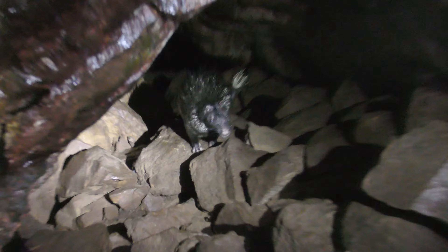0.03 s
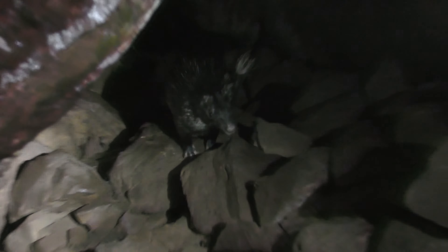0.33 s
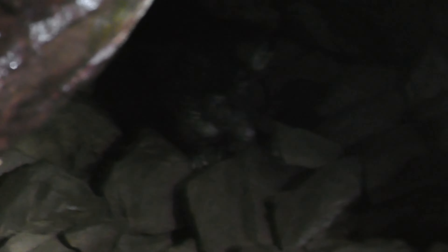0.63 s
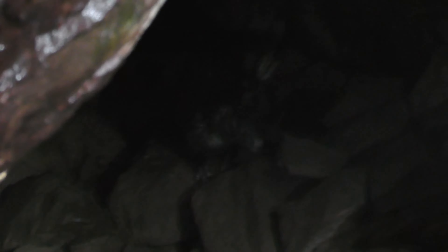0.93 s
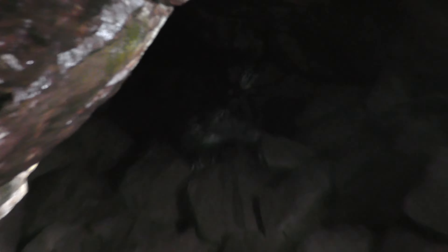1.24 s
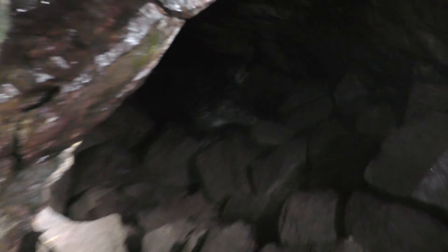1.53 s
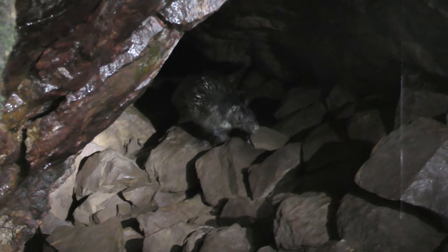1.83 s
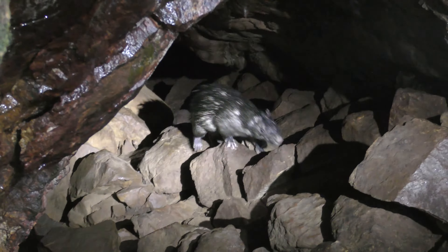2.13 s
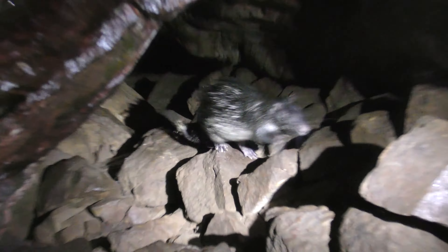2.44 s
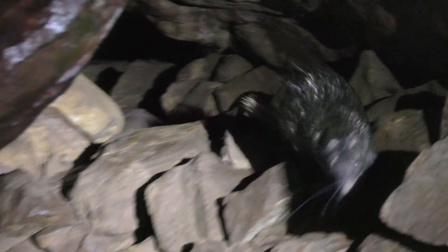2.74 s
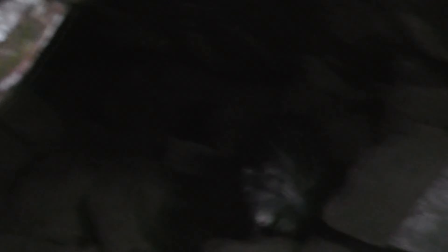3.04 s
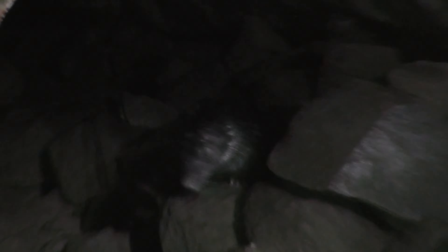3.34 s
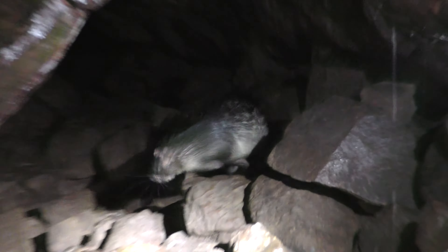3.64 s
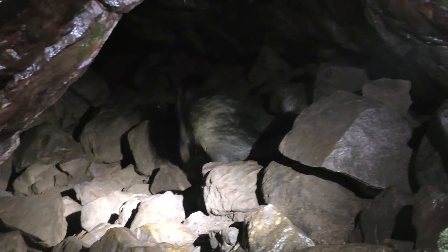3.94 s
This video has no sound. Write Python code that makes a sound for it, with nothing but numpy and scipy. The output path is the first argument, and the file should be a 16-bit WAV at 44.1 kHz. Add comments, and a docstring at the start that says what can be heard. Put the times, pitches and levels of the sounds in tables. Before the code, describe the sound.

A porcupine sniffs close by in a rock hollow, over steady air noise and a faint quill rustle. Claws tick on stone from the start, and sparse short sniffs begin around 0.6 seconds. From about 2.3 seconds the sniffs come quickly, with more clicks. Between 3.2 and 3.6 seconds it blows one long hiss with a fading nose whistle, and a few more sniffs and scrapes follow until 4 seconds.

```python
"""A porcupine noses over loose stones in a low rock hollow, close to the microphone.
A steady rush of air and a faint rustle come in first, with claws and quills ticking on stone.
Short sniffs puff through the nose, sparse at first, then about fourteen a second as it grows keen.
Just after three seconds it blows out one long hiss with a fading nostril whistle,
and ends on a few more sniffs and scrapes."""
import sys
import numpy as np
from scipy import signal
from scipy.io import wavfile
from scipy.ndimage import uniform_filter1d

SR = 44100
rng = np.random.default_rng(int(sys.argv[2]) if len(sys.argv) > 2 else 0)


def log_audio(samples):
    """Write samples as a 16-bit WAV file to the path given in sys.argv[1]."""
    # one column per channel
    frames = np.atleast_2d(samples).T
    # limit to full scale, then quantise
    limited = np.clip(frames, -1, 1)
    pcm = np.round(limited * 32767).astype(np.int16)
    wavfile.write(sys.argv[1], SR, pcm)


N = 176400

# Sniff cues, with the mix of five nose resonances (positive pan is left throughout):
# start_s, rise_s, length_s, nostril_hz, upper_hz, throat_db, nostril_db, upper_db, edge_db,
# fizz_db, pan_db
SNIFF_CUES = [(0.649, 0.0026, 0.017, 4984, 6820, -47.0, -49, -59, -52, -62.3, -1.9),
              (0.706, 0.004, 0.0193, 4900, 6879, -55, -48, -63, -66, -67, 3.6),
              (1.0804, 0.0044, 0.0097, 4690, 6030, -41.2, -34, -48, -43, -35, -6.0),
              (1.225, 0.008, 0.013, 4650, 6820, -54, -41.5, -46, -44, -43.5, -4.4),
              (1.393, 0.0013, 0.02, 4520, 7130, -53, -37, -48, -50, -46.8, -4),
              (1.536, 0.006, 0.014, 4820, 6066, -49.8, -40, -43, -44, -41, -4.3),
              (2.258, 0.0013, 0.013, 4680, 7560, -49.0, -35, -40, -35, -43, -3.5),
              (2.355, 0.0011, 0.0054, 4140, 7270, -42.5, -34.5, -34, -49, -43.0, -5),
              (2.41, 0.0026, 0.01, 4530, 6310, -58, -32, -34, -32, -45, -3),
              (2.486, 0.0031, 0.0068, 4216, 7070, -37.5, -25, -31.4, -36, -38.7, -5.0),
              (2.561, 0.0015, 0.012, 4430, 7220, -48, -40.5, -35.5, -40.5, -44.9, -2.1),
              (2.626, 0.006, 0.017, 4510, 7924, -39, -38, -38.5, -48, -46, -3),
              (2.6986, 0.0043, 0.015, 4500, 7531, -48, -41.5, -36.5, -40.5, -45, -2.9),
              (2.775, 0.0015, 0.014, 4190, 6570, -37.5, -36, -45, -43, -43, -2.8),
              (2.832, 0.0071, 0.018, 4240, 5980, -57, -41.5, -43, -40.2, -42.4, -2),
              (2.967, 0.0018, 0.031, 4350, 7020, -60, -38, -42, -41.5, -52, -2.9),
              (3.1016, 0.0043, 0.014, 4460, 7850, -40.5, -31, -33.5, -49, -41, -2.5),
              (3.4234, 0.0045, 0.0183, 3999, 8220, -43.5, -35, -41.5, -57, -50, -2),
              (3.603, 0.0015, 0.027, 4440, 8200, -60, -39.5, -46, -61, -52, -3.1),
              (3.7547, 0.0054, 0.011, 4460, 7789, -44, -29, -43, -37.5, -46, -6.1),
              (3.772, 0.0015, 0.013, 4290, 7784, -60, -36.5, -41, -51, -44, -1),
              (3.937, 0.0056, 0.0099, 3850, 6450, -47.3, -41.5, -34, -49, -44, -0.7)]


def sniff(rise_s, length_s, nostril_hz, upper_hz, throat_db, nostril_db, upper_db, edge_db,
          fizz_db, pan_db):
    """A fluttering puff of air through the resonances of the nose; a thin whistle lingers."""
    release_s, ring_release_s, flutter_s, flutter_db, ring_db = 0.0055, 0.014, 0.0011, 3, -11.5
    t = np.arange(SR // 16) / SR
    attack, past_end_s = np.minimum(t / rise_s, 1), np.maximum(t - length_s, 0)
    flutter = unit(uniform_filter1d(rng.standard_normal(len(t)), int(flutter_s * SR)))
    flow = attack * np.exp(-past_end_s / release_s) * amp(flutter_db * flutter)
    # pitch_hz, width_hz, level_db
    nose = [(2406, 1930, throat_db), (nostril_hz, 1070, nostril_db), (upper_hz, 1650, upper_db),
            (9600, 2200, edge_db), (12430, 5000, fizz_db)]
    puff = sum(amp(db) * unit(flow * turbulence(len(t), hz, width)) for hz, width, db in nose)
    linger = attack * np.exp(-past_end_s / ring_release_s) * (1 - t / t[-1])
    puff += amp(nostril_db + ring_db) * unit(linger * turbulence(len(t), nostril_hz, width_hz=200))
    puff *= np.sqrt(length_s / t[-1])  # longer puffs carry more energy
    return hollow(puff, pan_db, wet_db=-3)


# Swell and fade of the long breath: time_s, level_db
HISS_ENVELOPE = [(3.158, -46), (3.167, -38.5), (3.22, -35.5), (3.3, -34.5), (3.37, -36), (3.42, -37),
                 (3.47, -39), (3.53, -42.5), (3.58, -46)]
# Tone of the breath, brightest in the low treble: frequency_hz, gain_db
HISS_EQ = [(300, -30), (800, -12), (1250, -1), (1900, -8), (3300, -5.5), (4000, 9), (5100, 6), (6500, 3.5),
           (8200, 1.5), (10000, 1), (12000, -6.5), (16000, -9)]


def hiss():
    """The animal blows out at length: uneven hiss with a nostril whistle that fades early."""
    patch_db, whistle_db, fade_db_per_s, pan_db = 1, 0.5, 75, -1
    cue_s, level_db = np.transpose(HISS_ENVELOPE)
    t = np.arange(N) / SR
    flow = amp(np.interp(t, cue_s, level_db)) * (t > cue_s[0]) * (t < cue_s[-1])
    spectrum = signal.stft(rng.standard_normal(N), nperseg=512)[2]
    spectrum *= amp(patch_db * patches(rng.standard_normal(spectrum.shape), 4, 5))
    rush = signal.istft(spectrum, nperseg=512)[1]
    rush = unit(equalise(rush, HISS_EQ)[:N])
    fade = amp(whistle_db - fade_db_per_s * np.maximum(t - cue_s[0], 0))
    whistle = turbulence(N, hz=3980, width_hz=100) * fade
    breath = hollow(flow * rush, pan_db, wet_db=-5.5) + hollow(flow * whistle, pan_db, wet_db=-10)
    return breath[:, :N]


# Claw and quill hits, each with its own four-band EQ:
# start_s, length_s, low_db, mid_db, high_db, top_db, pan_db
STONE_HITS = [(0.0864, 0.0031, -4, -9, -10, -28, -2), (0.385, 0.001, -5.5, -9, -6, -24, -3),
              (0.5516, 0.00036, 1, -9, -7, -21.3, 1.8), (0.5527, 0.00026, -4, -3, -11.5, -13.9, -1),
              (0.558, 0.0002, -4, -7, -11, -19.1, 5), (0.5745, 0.0016, 4, -1.5, -4, -11, -0.2),
              (1.073, 0.002, -3.5, -24, -14, -14, 2.2), (1.088, 0.0011, -14, 6, -20, -18, -7.5),
              (1.631, 0.0011, -5.5, -6.5, -16, -36.6, 2), (2.2014, 0.0001, -9.5, -2, 7, -8.0, -4.6),
              (2.2423, 0.001, -12, -5, -26, -35.3, 0.4), (2.266, 0.0016, -19, 3.8, -14, -20, -13),
              (2.637, 0.0017, -1.5, 1.5, -24, -16, -17), (2.718, 0.002, -2.5, -14, -16, -14, -11),
              (2.777, 0.0024, 2.3, -3, -29, -24, -13), (2.8132, 0.0033, -2.5, -7, -8, -16, 3),
              (2.955, 0.001, -55, -13.5, -12, -21.1, 2.6), (3.016, 0.0053, -10, -12, -29, -30, 0),
              (3.097, 0.0014, -2, -7, -24, -20.3, -6), (3.17, 0.0025, -3, -2, -21, -14.5, -5),
              (3.245, 0.0033, -4.5, -22, -20, -31, 4), (3.349, 0.0098, -2, -25, -17, -21.3, -9),
              (3.366, 0.008, 0.3, -31, -15, -24, -5), (3.438, 0.0042, -6, 5, -24, -13.3, -18),
              (3.524, 0.012, -1, -22, -22, -27, -4), (3.554, 0.0033, 9.5, -6, -1.5, -2, -2.5),
              (3.592, 0.00059, 5, -14, -18, -15.9, -1.0), (3.5933, 0.0038, -1, -6, -6, -18, -2.1),
              (3.809, 0.0034, -1.5, -20, -19.7, -25.6, 1.4), (3.886, 0.003, -23, -18, -13, -14, -2),
              (3.917, 0.0052, -5.5, -18, -16, -26, 0)]
# The low, mid, high and top bands: frequency_hz
STONE_BANDS = [2230, 3980, 8200, 13500]
# Body of the stone, relative to the low band: frequency_hz, gain_db
STONE_BODY_EQ = [(60, -27), (340, -6.5), (600, -14.5), (830, -14), (1200, -3)]


def stone_hit(length_s, low_db, mid_db, high_db, top_db, pan_db):
    """A hard tip meets stone: a single snap when short, a gritty scrape when longer."""
    grit_spread_db, grit_density = 2.1, 0.6
    t = np.arange(SR // 50) / SR
    grit = rng.standard_normal(len(t)) * amp(grit_spread_db * rng.exponential(1, len(t)))
    grit *= rng.random(len(t)) < grit_density
    grit[0] = 3  # the first touch
    grit *= np.exp(-(t / length_s) ** 2)
    body = [(hz, low_db + db) for hz, db in STONE_BODY_EQ]
    bands = list(zip(STONE_BANDS, [low_db, mid_db, high_db, top_db]))
    return hollow(equalise(grit / np.linalg.norm(grit), body + bands), pan_db, wet_db=-3.5)


# Tone of the quills, broad with no bass: frequency_hz, gain_db
QUILL_EQ = [(200, -41), (800, 3.5), (1500, 2), (4500, 1), (9000, 0.5), (15000, -16)]


def quill_rustle():
    """Random small scuffs as the coat of quills shifts."""
    scuffs_per_s, spread_db, decay_s, level_db = 60, 4.5, 0.0034, -51
    onsets = rng.random(N) < scuffs_per_s / SR
    strength = amp(spread_db * np.minimum(rng.exponential(1, N), 3))
    envelope = signal.lfilter([1], [1, -np.exp(-1 / (decay_s * SR))], onsets * strength)
    scuffs = equalise(envelope * rng.standard_normal(N), QUILL_EQ)
    return amp(level_db) * unit(hollow(scuffs, pan_db=0.5, wet_db=-6)[:, :N])


# Tone of the air bed: frequency_hz, gain_db
AIR_EQ = [(20, -22), (45, -11), (80, -8), (110, -9), (150, -7), (180, -1), (215, -1.5), (270, -1), (350, 0),
          (440, -0.5), (510, -6), (650, -6), (790, -9.5), (1120, -1.5), (1660, -1.5), (3000, -3.5),
          (4670, -8), (5850, -12), (9670, -16), (12400, -18.5), (16000, -24)]
# How alike the two sides are: frequency_hz, coherence (0 wide, 1 narrow)
AIR_COHERENCE = [(30, .15), (70, .3), (120, 0.41), (200, 0.82), (380, 0.9), (700, 0.63), (1300, 0.3),
                 (2400, 0.44), (4400, 0.57), (8000, 1), (15000, 0.22)]
# How far the left side leads: frequency_hz, phase_rad
AIR_LEFT_LEAD = [(600, 0.18), (1380, 0.52), (2700, 0.31), (4800, -0.047), (6000, -0.11)]
# Lean to left or right: frequency_hz, pan_db
AIR_PAN = [(60, -0.5), (180, -0.35), (550, -2.9), (1650, 0.5), (4970, 0.87), (15000, -0.79)]
# Slow fader ride on the bed: time_s, level_db
AIR_ENVELOPE = [(0.1, -41), (1.0, -40), (2.0, -40.5), (2.9, -40), (3.5, -39), (4.0, -41)]


def air():
    """A steady, diffuse rush of air whose tone and level flicker slightly."""
    patch_db, flicker_db = 1.03, 0.58
    frames, hz = N // 256 + 5, np.fft.rfftfreq(1024, 1 / SR)
    noise = rng.standard_normal((5, frames, len(hz)))
    left, independent = noise[0] + 1j * noise[1], noise[2] + 1j * noise[3]
    coherence = curve_at(AIR_COHERENCE, hz)
    right = coherence * left + np.sqrt(1 - coherence ** 2) * independent
    right *= np.exp(-1j * curve_at(AIR_LEFT_LEAD, hz))
    lean = amp(curve_at(AIR_PAN, hz) / 2)
    drift_db = patch_db * patches(noise[4], 8, 12) + flicker_db * rng.standard_normal((frames, 1))
    spectrum = np.array([left * lean, right / lean]) * amp(curve_at(AIR_EQ, hz) + drift_db)
    rush = signal.istft(spectrum.transpose(0, 2, 1), nperseg=1024, noverlap=768)[1][:, :N]
    return unit(rush) * amp(np.interp(np.arange(N) / SR, *np.transpose(AIR_ENVELOPE)))


def hollow(x, pan_db, wet_db):
    """Pans a sound; nearby rock throws it back for a moment, then the hollow dies away."""
    near_s, near_decay_s, tail_db, t60_s = 0.0078, 0.0028, -7, 0.19
    shared_echo, left_lead_s = 0.6, 8e-6
    t = np.arange(SR // 4) / SR
    decay = np.exp(-np.maximum(t - near_s, 0) / near_decay_s) + amp(tail_db - 60 * t / t60_s)
    echoes = rng.standard_normal((3, len(t))) * decay  # left, right, shared
    echoes *= (rng.random(echoes.shape) < .2) * (t > .001)  # sparse, after a 1 ms gap
    echoes /= np.linalg.norm(echoes, axis=1, keepdims=True)
    paths = amp(wet_db) * (np.sqrt(shared_echo) * echoes[2] + np.sqrt(1 - shared_echo) * echoes[:2])
    # Direct sound reaches the left microphone a little earlier
    lag = np.array([[-.5], [.5]]) * left_lead_s * SR
    paths[:, :17] += np.sinc(np.arange(17) - 8 - lag) * np.hanning(17)
    sides = unit(amp([[pan_db / 2], [-pan_db / 2]]))
    return sides * signal.fftconvolve(x[None], paths, axes=1)


def turbulence(size, hz, width_hz):
    """Air noise ringing in one steep-sided resonance."""
    pole = np.exp(-np.pi * width_hz / SR)
    noise = rng.standard_normal((size + 512, 2)) @ [1, 1j]
    wander = signal.lfilter([1], [1, -2 * pole, pole * pole], noise)[-size:]
    return unit((wander * np.exp(2j * np.pi * hz * np.arange(size) / SR)).real)


def patches(noise, rows, columns):
    """Blurs a grid of noise into soft patches across time and frequency."""
    return unit(uniform_filter1d(uniform_filter1d(noise, rows, axis=0), columns, axis=1))


def equalise(x, eq):
    """Minimum-phase EQ: nothing rings ahead of an attack."""
    log_gain = np.log(amp(curve_at(eq, abs(np.fft.fftfreq(2048, 1 / SR)))))
    response = np.exp(np.conj(signal.hilbert(log_gain)))
    return signal.fftconvolve(x, np.fft.ifft(response).real[:1024])


def curve_at(points, hz):
    """Reads a table on a log-frequency axis."""
    point_hz, value = np.transpose(points)
    return np.interp(np.log(hz + 1), np.log(point_hz + 1), value)


def amp(db):
    """Decibels to gain."""
    return 10 ** (np.asarray(db) / 20)


def unit(x):
    """Scales to rms 1."""
    return x / np.sqrt(np.mean(x ** 2) + 1e-20)


def add(mix, start_s, sound):
    """Mixes a stereo sound in at its cue."""
    part = mix[:, round(start_s * SR):][:, :sound.shape[1]]
    part += sound[:, :part.shape[1]]


def scene():
    """The animal's nose, claws and quills over the air of the hollow."""
    mix = air() + quill_rustle() + hiss()
    for start_s, *cue in SNIFF_CUES:
        add(mix, start_s, sniff(*cue))
    for start_s, *cue in STONE_HITS:
        add(mix, start_s, stone_hit(*cue))
    return mix


def record(dry):
    """The sound opens after a moment of silence, with the top treble cut off."""
    start_s, cutoff_hz = 0.084, 15950
    gated = dry * (np.arange(N) / SR >= start_s)
    lowpass = signal.firwin(401, cutoff_hz, window=("kaiser", 8), fs=SR)
    return signal.oaconvolve(gated, lowpass[None], "same")


dry = scene()
out = record(dry)
log_audio(out)
```